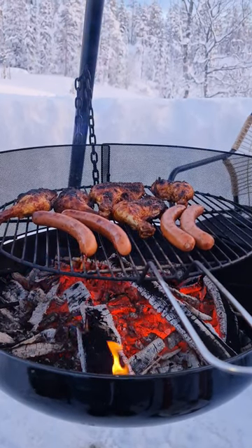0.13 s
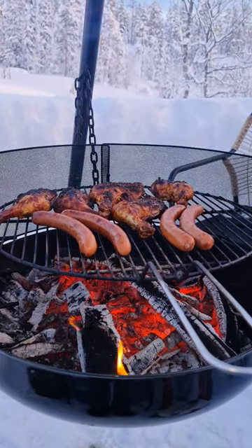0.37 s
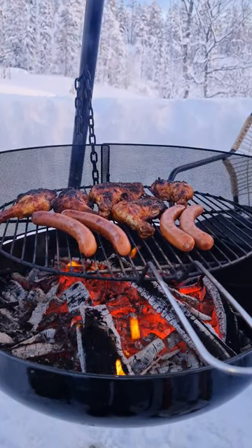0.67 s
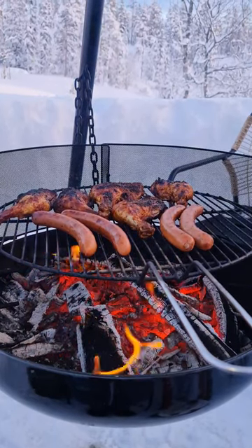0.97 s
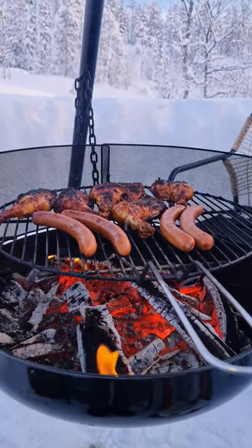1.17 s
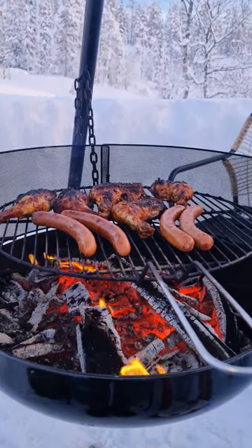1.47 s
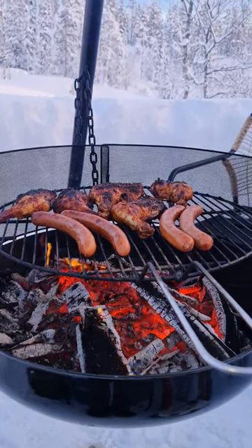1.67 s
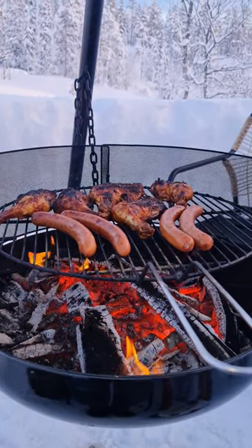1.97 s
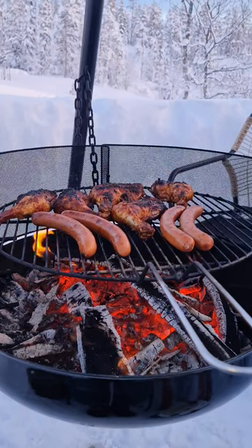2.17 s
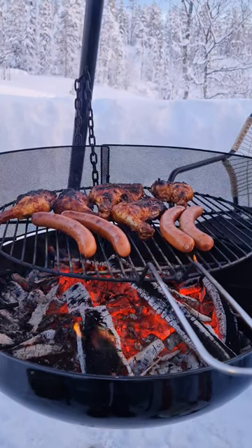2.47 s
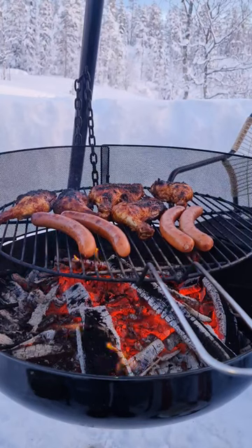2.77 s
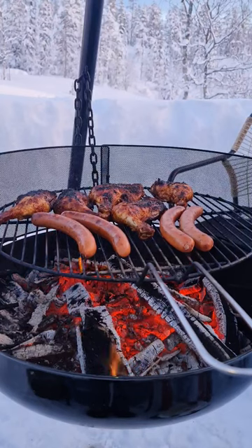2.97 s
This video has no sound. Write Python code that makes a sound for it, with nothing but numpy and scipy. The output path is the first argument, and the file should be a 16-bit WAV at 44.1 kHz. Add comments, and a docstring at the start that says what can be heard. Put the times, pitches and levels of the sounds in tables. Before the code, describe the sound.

A small wood fire crackles in a steel bowl, close and dry in open air. Sharp snaps come at 0.2, 0.7 and 1.0 seconds, a hollow log pop at 1.1, a hard crack with a dull knock at 1.5, a bright cluster near 2.05, another snap at 2.35. Fine fat sizzle runs throughout, slightly right, with scattered ticks and low flame flutter; a soft whoof and knock end it around 3.05.

```python
"""Outdoors in the snow: a small wood fire burns in a steel bowl under a grill.
The logs snap and tick: an edge, a noise burst and a scattered tail, rung through the bowl's resonances.
The flames flutter low: banded noise with soft tone flaps and resonant whoofs; a log pops, knocks sound dull.
Fat sizzles finely on the meat, mostly a little to the right: hiss and random bursts; faint ticks lie over it."""
import sys
import numpy as np
from scipy import signal
from scipy.fft import rfft, irfft
from scipy.io import wavfile

SR = 44100
rng = np.random.default_rng(int(sys.argv[2]) if len(sys.argv) > 2 else 0)


def wrap_up_sound(samples):
    """Save the sound to the file named by the first command line argument, as 16-bit audio."""
    columns = np.atleast_2d(samples).T
    # keep every value between -1 and 1, then stretch to whole-number steps
    tamed = np.clip(columns, -1, 1)
    steps = np.round(tamed * 32767).astype(np.int16)
    wavfile.write(sys.argv[1], SR, steps)


N = 137151
TIME_S = np.arange(N) / SR

# noise bands, 2.5 per octave
EDGES_HZ = 22 * 2 ** (np.arange(25) * 2 / 5)
CENTRES_HZ = np.sqrt(EDGES_HZ[1:] * EDGES_HZ[:-1])
BANK = [signal.butter(2, pair, "band", fs=SR, output="sos") for pair in zip(EDGES_HZ, EDGES_HZ[1:])]
# left-right likeness of wide sounds: f/Hz, likeness/1
LIKENESS = [(50, 0.69), (250, 0.89), (1000, 0.22), (3500, 0.28), (7500, 0.017)]

# flame strength, before FLAME_DB: t/s, relative level/dB
FLAME_LEVEL = [(.44, -74), (.53, -68), (.82, -67.5), (.9, -71), (1.46, -71), (1.54, -65), (1.68, -67),
               (1.8, -72), (2.48, -73), (2.6, -69), (3.11, -66.5)]
# flame spectrum: f/Hz, relative density/dB per Hz
FLAME_SPECTRUM = [(20, 0), (55, 0.5), (100, 2.5), (160, -6.5), (260, 1.5), (370, -6), (450, -6),
                  (590, -11.5), (720, -17.5), (1400, -19)]
FLAME_DB, FLAME_PAN_DB = 3, -3.5
FLAME_FLICKER_DB, FLAME_FLICKER_HZ = 4, 14
# flaps of flame: t/s, level/dB, f/Hz
FLAPS = [(0.549, -62, 69.6), (0.653, -54, 265), (0.802, -52, 230), (1.372, -56, 332), (1.531, -54, 115),
         (1.634, -59, 246), (1.679, -56.5, 140), (2.556, -56.5, 75), (2.628, -50.5, 273), (2.646, -56, 145),
         (2.805, -56, 172)]
FLAP_SWELL_CYCLES = 0.8

# sizzle strength: t/s, relative level/dB
SIZZLE_LEVEL = [(0, -60), (.07, -56), (.28, -59), (.87, -57.5), (1.0, -60), (1.95, -58), (2.44, -59.5),
                (2.54, -58), (2.82, -59), (3.11, -54.5)]
# sizzle spectrum: f/Hz, relative density/dB per Hz
SIZZLE_SPECTRUM = [(400, -24), (750, -24), (1300, -14), (1900, -10.5), (2800, -6), (3800, -9), (5200, -7),
                   (6900, -9), (8500, -8.5), (12000, -4.5), (15500, -6)]
# sizzle position: f/Hz, left over right/dB
SIZZLE_PAN = [(1000, 12.5), (2200, -6.5), (4500, -2), (7500, 0), (14000, -10)]
SIZZLE_FLICKER_DB, SIZZLE_FLICKER_HZ = 1.2, 25
HISS_DB, SPATTER_DB = 3.5, -2.5
SPATTERS_PER_S, SPATTER_SPREAD_DB, SPATTER_DECAY_S = 890, 6, 0.0005

# wood snaps: t/s, relative body, knock, crack and treble level/dB, left over right/dB,
# burst length/s, log ring f/Hz
SNAPS = [(0.1930, -34.5, -40.5, -37, -40, -6.5, 0.00038, 3580),
         (0.1938, -44, -41, -36.5, -30, -4, 0.00044, 5240), (0.2005, -56, -72, -41, -37, -20, 0.0027, 5260),
         (0.2516, -67, -55, -43.5, -34.5, -9, 0.0004, 12900),
         (0.684, -54, -59.5, -47, -41.5, -14, 0.00055, 1650),
         (0.972, -51, -55, -43, -37.5, -5.5, 0.00097, 2760),
         (1.1181, -45, -47, -45, -39, -11, 0.00046, 1130),
         (1.4828, -65, -53, -43, -39.5, -26, 0.0021, 2180),
         (1.487, -47, -52, -43, -41.5, 1, 0.00091, 14000),
         (1.4948, -43.5, -29, -29, -45, -2.5, 0.000095, 1670),
         (1.497, -49, -43, -38, -36, -6, 0.0018, 1060), (1.65, -59, -55, -45, -38.5, -1, 0.00053, 1670),
         (1.7931, -47, -43.5, -48.5, -41, -5.5, 0.00045, 2500),
         (2.0477, -44, -37, -35, -34, -4, 0.00017, 2670),
         (2.0498, -45.5, -46, -43, -30, -15, 0.00071, 2800), (2.0522, -57, -42, -34, -37, 2, 0.00031, 4320),
         (2.0579, -52, -38, -35, -27.5, -3, 0.0018, 505),
         (2.0639, -43.5, -37.5, -34, -37, -5, 0.00048, 980),
         (2.3456, -57, -45.5, -36.5, -28.5, -3.5, 0.0031, 2800),
         (2.9636, -67, -57, -49, -40.5, -12, 0.0011, 2740)]
# thin ticks of embers and spits of fat: t/s, relative level/dB
TICKS = [(0.1772, -39.5), (0.3865, -47), (0.4530, -44), (.6008, -40.5), (.7487, -40), (0.9846, -43.5),
         (1.0482, -46), (1.2866, -46), (1.3225, -50), (1.6830, -43), (1.929, -47), (1.9930, -46),
         (2.0367, -44), (2.0703, -42), (2.2003, -42), (2.4203, -44.5), (2.5195, -42.5), (2.5322, -42),
         (2.5718, -38.5), (2.6025, -39), (2.6350, -44.5), (2.7168, -42), (2.9851, -44.5)]
# where body, knock, crack and treble lie: f/Hz
REGISTERS_HZ = (400, 1200, 3300, 10000)
# bowl colour on snaps and ticks: f/Hz, relative level/dB
BOWL_COLOUR = [(30, -29.5), (190, -11), (350, 2), (520, 0.5), (720, -13), (1020, -2), (1300, -11),
               (1650, -4), (2700, -3), (4500, -5), (6700, -7.5), (9000, -1), (14000, 1.5)]
# lean of snaps and ticks, added to their pan: f/Hz, left over right/dB
SNAP_LEAN = [(400, -1.5), (1000, 11), (2200, 1), (4800, 5), (9000, -2.5)]
# rings of bowl and grate: f/Hz, relative level/dB, t60/s
BOWL_MODES = [(395.5, -5.5, 0.16), (2188, -6, 0.17), (2710, -9.5, 0.019), (3300, -8, 0.025),
              (13360, 1, 0.04)]
SNAP_DB, TICK_DB = 30.5, 28
TICK_COLOUR_DB, TICK_BURST_S, TICK_PAN_DB = (-21.5, -14.5, -5.5, 3.5), 0.00022, -6.5
SNAP_SAMPLES, LEAD_SAMPLES = 4096, 441
CLICK_SHARE, SPLINTER_SPREAD_DB = 2.6, 4
TAIL_DB, TAIL_S = -11, 0.0062
# short noise rise before each snap's edge
RISE_DB, RISE_S = -8, 0.0012
LOG_RING_DB, LOG_RING_T60_CYCLES = 3, 19.4
FINE_TICKS_PER_S, FINE_TICK_MIN_DB, FINE_TICK_RANGE_DB = 22, -26, 6

# whoofs of flame: peak t/s, level/dB, swell/s
WHOOFS = [(.67, -68, 0.017), (1.555, -61, 0.02), (3.042, -54.5, 0.028)]
WHOOF_HZ, WHOOF_T60_S = 291, 0.011

# modes of the popping log: f/Hz, level/dB
POP_MODES = [(370, -42), (1090, -42), (1850, -43.5), (2740, -52), (3900, -52)]
POP_S, POP_T60_S = 1.1168, 0.023

# hollow low knocks: t/s, level/dB, f/Hz, swell/s
KNOCKS = [(1.155, -52.5, 332, 0.0027), (1.4953, -42, 312, 0.0023), (1.52, -56, 388, 0.013),
          (3.069, -39, 362, 0.0041)]
KNOCK_PAN_DB = -6.5

CUTOFF_HZ = 15750


def from_db(db):
    """Decibels to gain."""
    return 10 ** (np.asarray(db) / 20)


def rms_one(x):
    """Scale to rms 1."""
    return x / np.sqrt(np.mean(x ** 2) + 1e-30)


def at_hz(points, hz):
    """Interpolate a table on a log-frequency axis."""
    f, v = np.transpose(points)
    return np.interp(np.log(hz), np.log(f), v)


def at_time(points):
    """Interpolate a table over the whole scene."""
    return np.interp(TIME_S, *np.transpose(points))


def pan(db):
    """Left and right gains of constant power; positive is left."""
    return rms_one(from_db([[db / 2], [-db / 2]]))


def drift(rate_hz):
    """Random wander of rms 1: noise through two equal low-pass poles, after a 1 s run-in."""
    r = np.exp(-2 * np.pi * rate_hz / SR)
    noise = rng.standard_normal(N + SR)
    return rms_one(signal.lfilter([1], [1, -2 * r, r * r], noise)[SR:])


def widen(pair, hz):
    """Mix two unrelated signals as mid and side to the tabled left-right likeness."""
    alike = np.clip(at_hz(LIKENESS, hz), 0, 1)
    mid, side = np.sqrt(1 + alike) * pair[0], np.sqrt(1 - alike) * pair[1]
    return mid + side * [[1], [-1]]


def add(out, s, sound):
    """Mix a sound in at a time in seconds."""
    part = out[:, max(int(s * SR), 0):][:, :sound.shape[-1]]
    part += sound[..., :part.shape[1]]


def resonate(x, hz, t60_s):
    """Two-pole resonance with peak gain 1."""
    r = np.exp(-np.log(1000) / (t60_s * SR))
    zeros = np.array([1, 0, -1]) * (1 - r * r) / 2
    poles = [1, -2 * r * np.cos(2 * np.pi * hz / SR), r * r]
    return signal.lfilter(zeros, poles, x)


def causal(gain):
    """Minimum-phase response with these gains, by folding the cepstrum."""
    cepstrum = irfft(np.log(gain))
    half = cepstrum.shape[-1] // 2
    cepstrum[..., 1:half] *= 2
    cepstrum[..., half + 1:] = 0
    return np.exp(rfft(cepstrum))


def thump(hz, swell_s):
    """Soft low tone whose envelope swells to 1 at swell_s and dies."""
    t = TIME_S[:SR // 6]
    envelope = t / swell_s * np.exp(1 - t / swell_s)
    return envelope * np.sin(2 * np.pi * hz * t)


def flames():
    """Low flutter of flickering banded noise, with single flaps as tongues of flame catch."""
    white, out = rng.standard_normal((2, 2, N)), 0
    for k, (hz, sos) in enumerate(zip(CENTRES_HZ, BANK)):
        if hz < FLAME_SPECTRUM[-1][0]:
            band = signal.sosfilt(sos, widen(white[k % 2], hz))
            out = out + from_db(at_hz(FLAME_SPECTRUM, hz)) * band
    flicker = from_db(FLAME_FLICKER_DB * drift(FLAME_FLICKER_HZ))
    out = rms_one(out * flicker) * from_db(at_time(FLAME_LEVEL) + FLAME_DB)
    for s, db, hz in FLAPS:
        add(out, s, from_db(db) * thump(hz, FLAP_SWELL_CYCLES / hz))
    return out * pan(FLAME_PAN_DB)


def spatter(rate_per_s):
    """Power of tiny fat bubbles bursting at random, each decaying; mean 1."""
    sizes = from_db(SPATTER_SPREAD_DB * np.minimum(rng.exponential(1, N), 4.5))
    bursts = (rng.random(N) < rate_per_s / SR) * sizes ** 2
    decay = np.exp(-2 / (SPATTER_DECAY_S * SR))
    power = signal.lfilter([1], [1, -decay], bursts + 1e-18)
    return power / power.mean()


def sizzle():
    """Fat frying: fine hiss full of tiny bursts, some broad and some confined to one band."""
    white, broad, out = rng.standard_normal((2, 2, N)), spatter(SPATTERS_PER_S), 0
    for k, (hz, sos) in enumerate(zip(CENTRES_HZ, BANK)):
        if hz > SIZZLE_SPECTRUM[0][0]:
            bursts = broad + spatter(SPATTERS_PER_S) / 2
            power = from_db(HISS_DB) ** 2 + from_db(SPATTER_DB) ** 2 * bursts
            band = signal.sosfilt(sos, widen(white[k % 2], hz) * np.sqrt(power))
            flicker_db = SIZZLE_FLICKER_DB * drift(SIZZLE_FLICKER_HZ)
            gain = from_db(at_hz(SIZZLE_SPECTRUM, hz) + flicker_db)
            out = out + gain * band * pan(at_hz(SIZZLE_PAN, hz))
    return out * from_db(at_time(SIZZLE_LEVEL))


def snap(colour_db, pan_db, burst_s):
    """Wood splits: a short noise rise, one sharp edge, a burst of uneven splinters, a scattered tail."""
    t = np.abs(TIME_S[:SNAP_SAMPLES] - TIME_S[LEAD_SAMPLES])
    hz = np.maximum(np.fft.rfftfreq(SNAP_SAMPLES, 1 / SR), 1)
    tail = from_db(TAIL_DB) * np.sqrt(burst_s / TICK_BURST_S) * np.exp(-t / TAIL_S)
    envelope = np.exp(-(t / burst_s) ** 2 / 2) + tail
    envelope[:LEAD_SAMPLES] = from_db(RISE_DB) * np.exp(-t[:LEAD_SAMPLES] / RISE_S)
    sizes = rms_one(from_db(SPLINTER_SPREAD_DB * np.clip(rng.standard_normal(len(t)), -2, 2)))
    splinters = rng.standard_normal((2, len(t))) * sizes * envelope
    splinters[0, LEAD_SAMPLES] = CLICK_SHARE  # the sharp edge, in the mid signal
    spectrum = widen(rfft(splinters / np.linalg.norm(splinters)), hz)
    level_db = at_hz(list(zip(REGISTERS_HZ, colour_db)), hz) + at_hz(BOWL_COLOUR, hz)
    sides = from_db((pan_db + at_hz(SNAP_LEAN, hz)) * np.array([[.5], [-.5]]))
    sides /= np.sqrt(np.mean(sides ** 2, axis=0))
    per_octave = np.sqrt(1000 / hz)  # equal power per octave
    return irfft(spectrum * causal(from_db(level_db) * per_octave * sides))


def fine_ticks():
    """Faint ticks at random times: short snaps with exponential gaps."""
    out = np.zeros((2, N))
    draws = rng.random((200, 3))
    times = np.cumsum(-np.log(1 - draws[:, 0])) / FINE_TICKS_PER_S
    for s, (_, size, side) in zip(times[times < N / SR], draws):
        gain = from_db(FINE_TICK_MIN_DB + FINE_TICK_RANGE_DB * size)
        add(out, s, gain * snap(TICK_COLOUR_DB, 2 * side * TICK_PAN_DB, TICK_BURST_S))
    return out


def crackle():
    """Snaps, each with the short ring of its log, and ticks; all excite the bowl's resonances."""
    out = np.zeros((2, N)) + 1e-18
    lead_s = TIME_S[LEAD_SAMPLES]
    for s, *colour_db, pan_db, burst_s, hz in SNAPS:
        crack = from_db(SNAP_DB) * snap(colour_db, pan_db, burst_s)
        log_ring = from_db(LOG_RING_DB) * resonate(crack, hz, LOG_RING_T60_CYCLES / hz)
        add(out, s - lead_s, crack + log_ring)
    for s, db in TICKS:
        add(out, s - lead_s, from_db(TICK_DB + db) * snap(TICK_COLOUR_DB, TICK_PAN_DB, TICK_BURST_S))
    bowl = sum(2 * from_db(db) * resonate(out, hz, t60_s) for hz, db, t60_s in BOWL_MODES)
    return out + bowl


def whoofs():
    """Flames swell and fade with a soft hollow rush: noise through one resonance twice."""
    out = np.zeros((2, N))
    for s, db, swell_s in WHOOFS:
        rush = widen(rng.standard_normal((2, N)), WHOOF_HZ)
        for _ in range(2):
            rush = resonate(rush, WHOOF_HZ, WHOOF_T60_S)
        swell = np.exp(-((TIME_S - s) / swell_s) ** 2 / 2)
        out += from_db(db) * rms_one(rush) * swell
    return out * pan(FLAME_PAN_DB)


def hollow_pop():
    """A pocket bursts in a log, which rings like a wood block: decaying sine modes."""
    out, t = np.zeros((2, N)), TIME_S[:SNAP_SAMPLES]
    decay = np.exp(-np.log(1000) * t / POP_T60_S)
    add(out, POP_S, sum(from_db(db) * decay * np.sin(2 * np.pi * hz * t) for hz, db in POP_MODES))
    return out


def knocks():
    """Dull hollow knocks: soft low tones."""
    out = np.zeros((2, N))
    for s, db, hz, swell_s in KNOCKS:
        add(out, s, from_db(db) * thump(hz, swell_s))
    return out * pan(KNOCK_PAN_DB)


def scene():
    """Fire and grill in still open air."""
    fire = flames() + crackle() + whoofs() + hollow_pop() + knocks()
    return fire + sizzle() + fine_ticks()


def record(dry):
    """Cut the top steeply with an elliptic low-pass."""
    return signal.sosfilt(signal.ellip(12, .1, 80, CUTOFF_HZ, fs=SR, output="sos"), dry)


dry = scene()
out = record(dry)
wrap_up_sound(out)
```